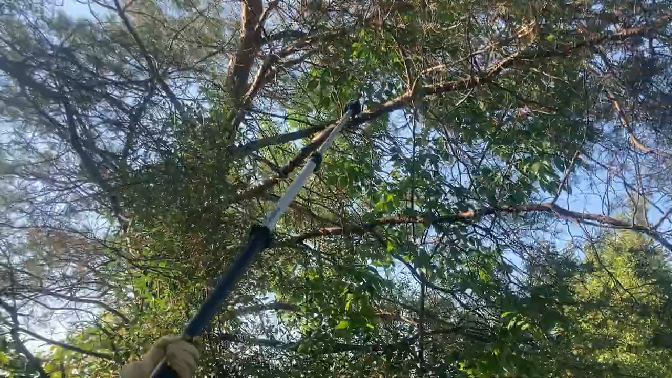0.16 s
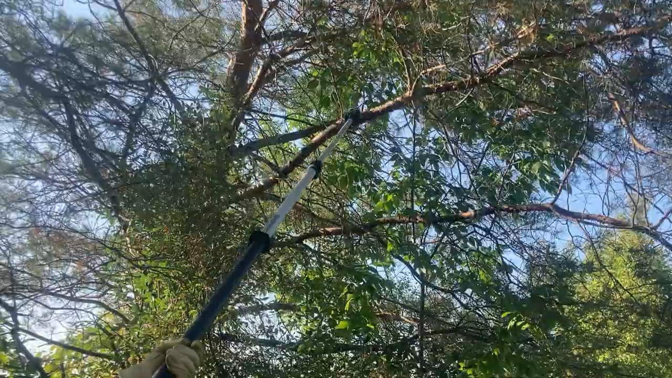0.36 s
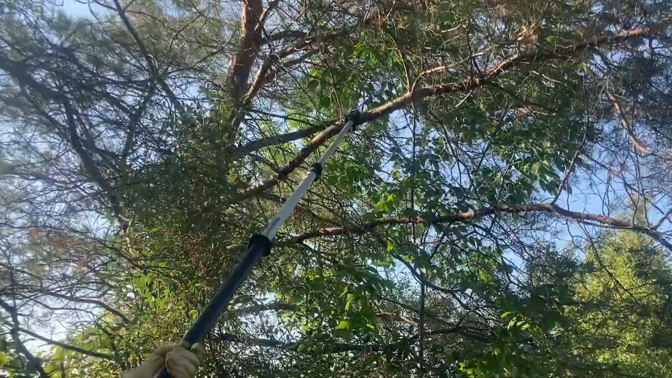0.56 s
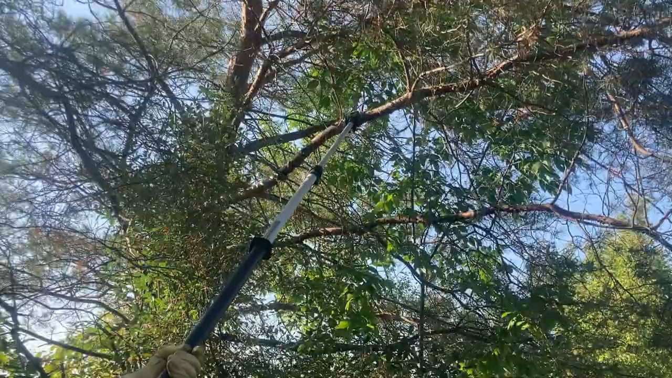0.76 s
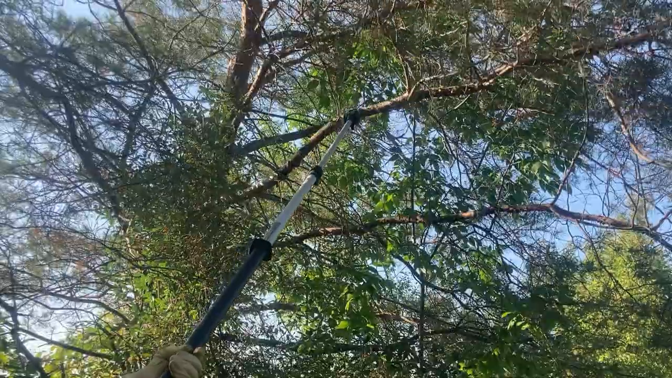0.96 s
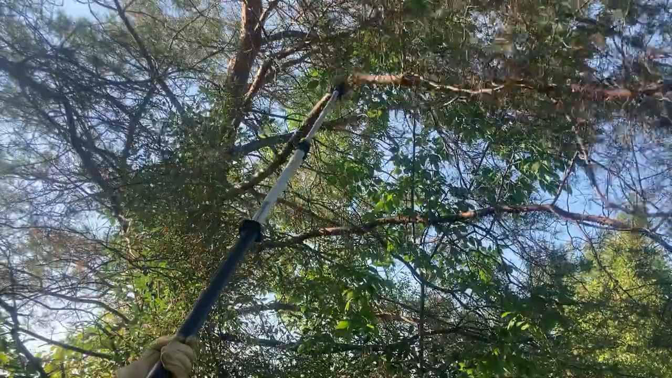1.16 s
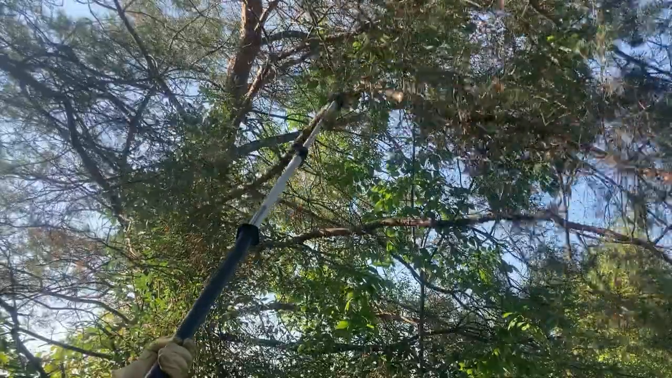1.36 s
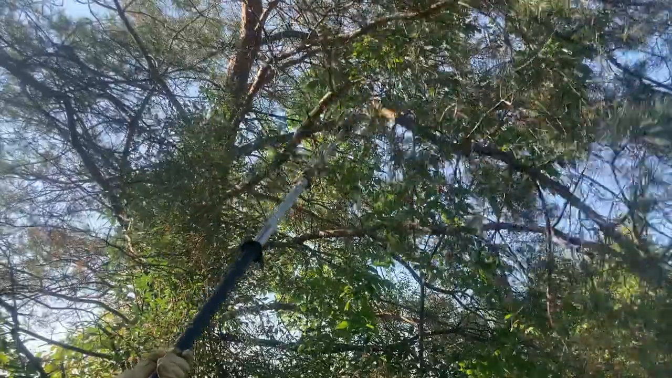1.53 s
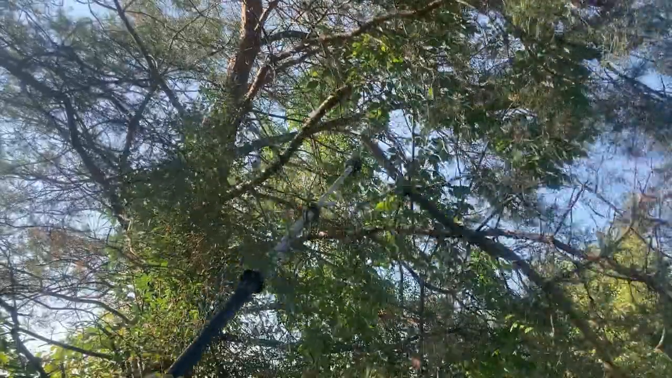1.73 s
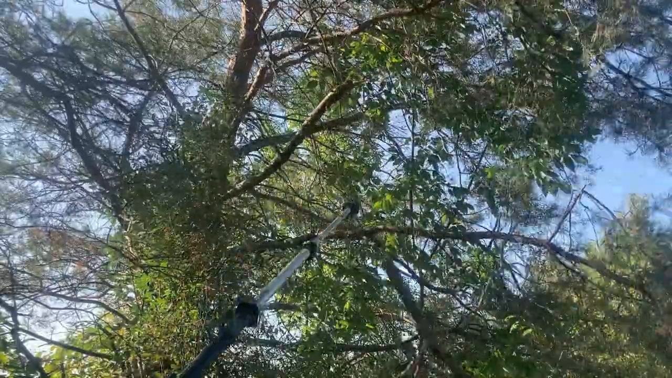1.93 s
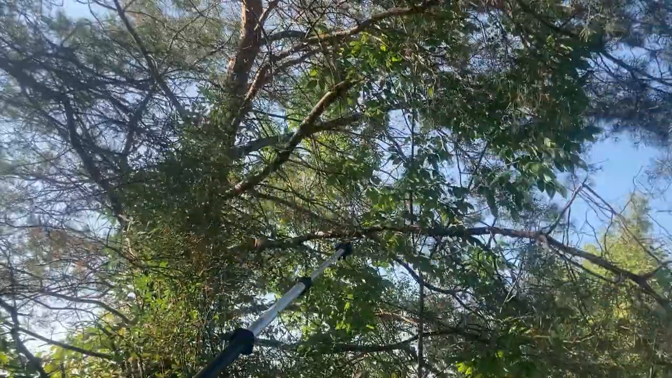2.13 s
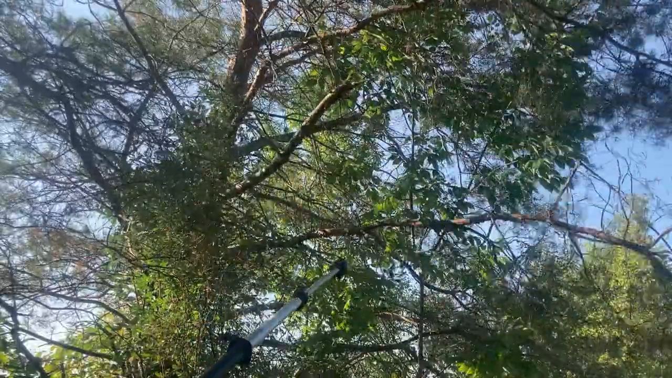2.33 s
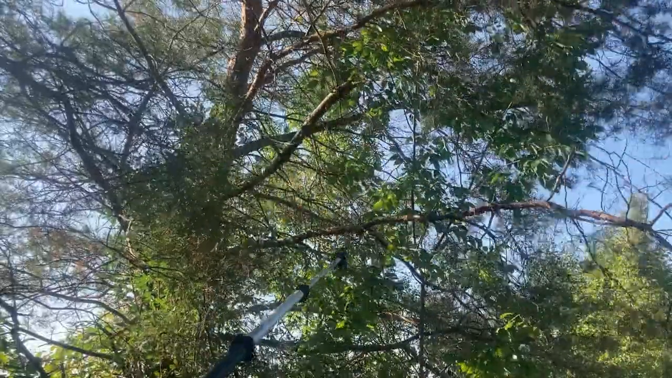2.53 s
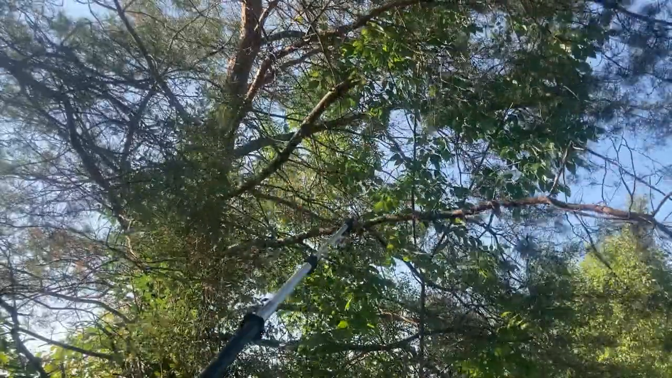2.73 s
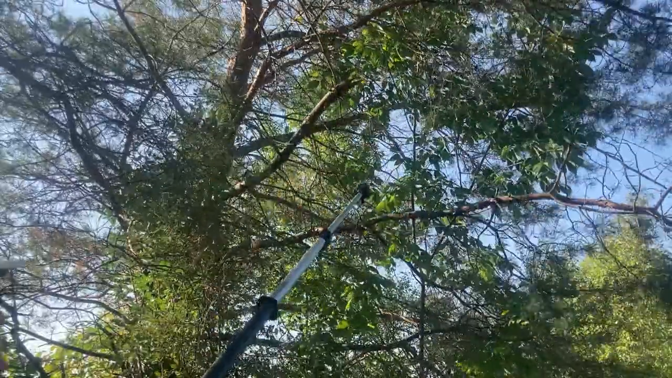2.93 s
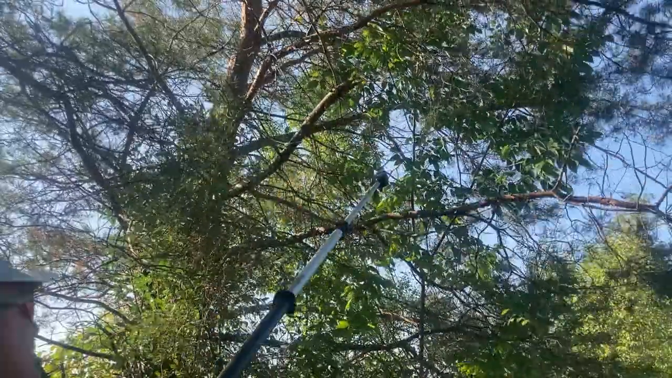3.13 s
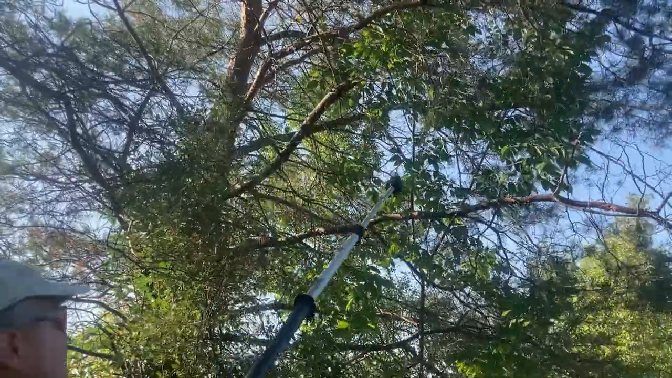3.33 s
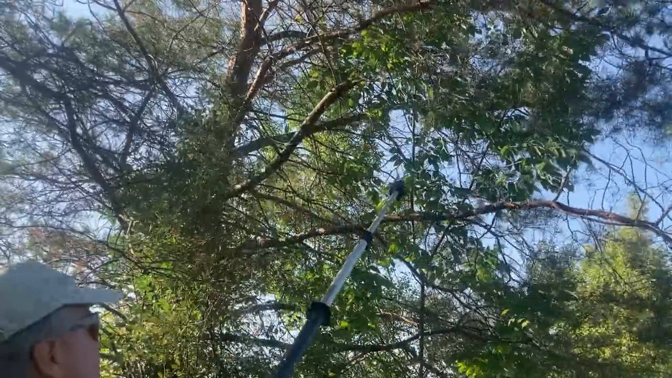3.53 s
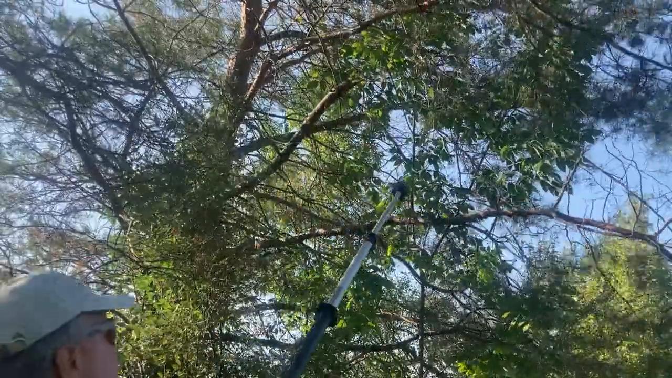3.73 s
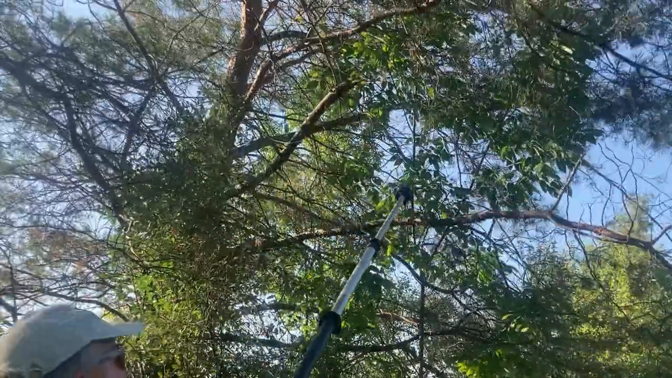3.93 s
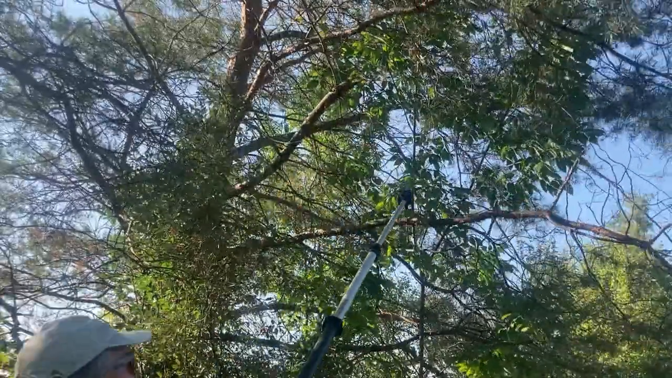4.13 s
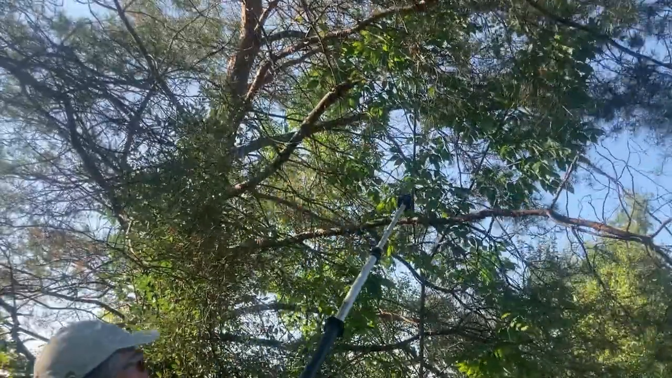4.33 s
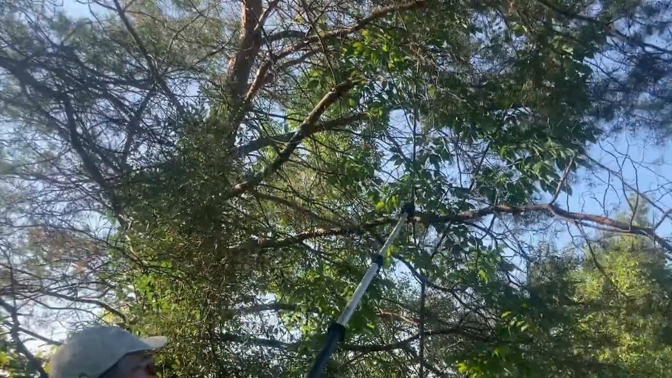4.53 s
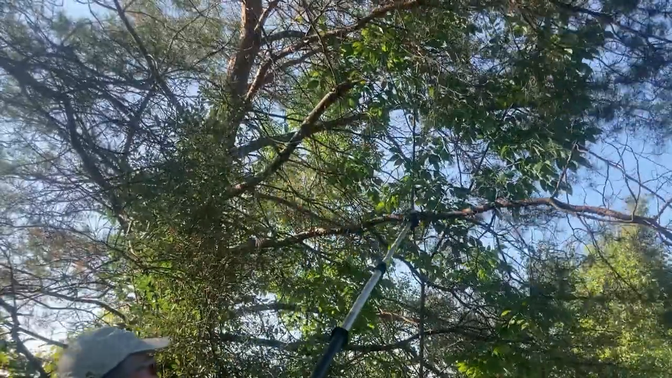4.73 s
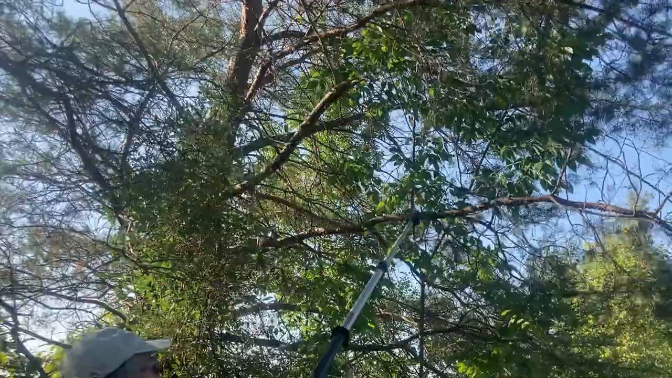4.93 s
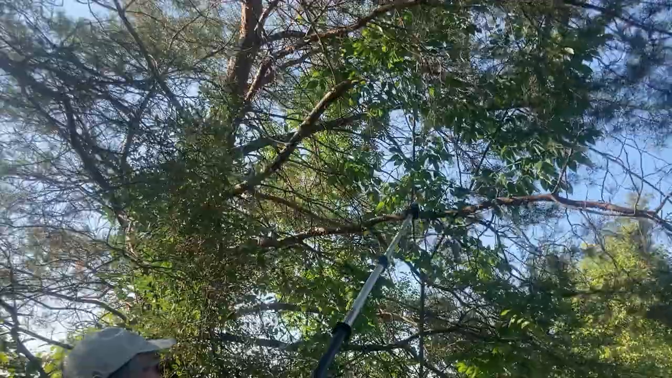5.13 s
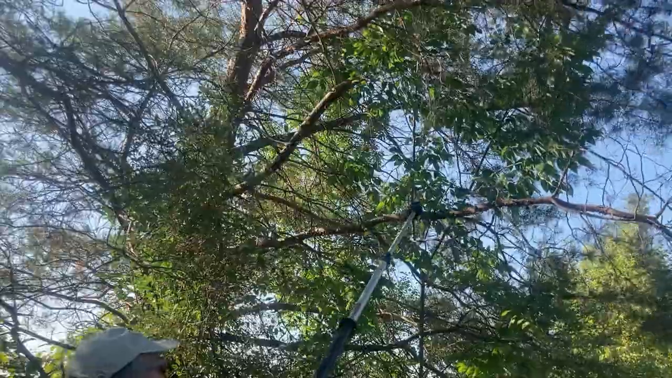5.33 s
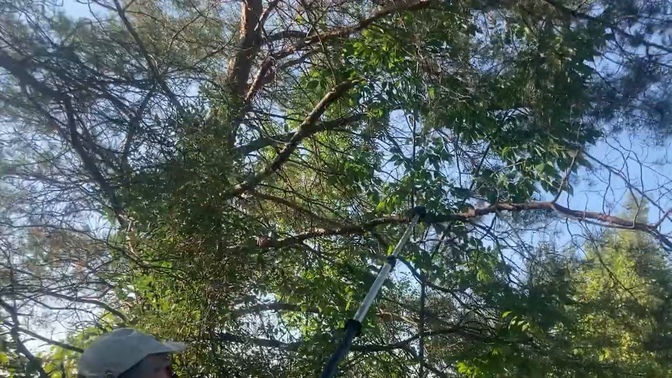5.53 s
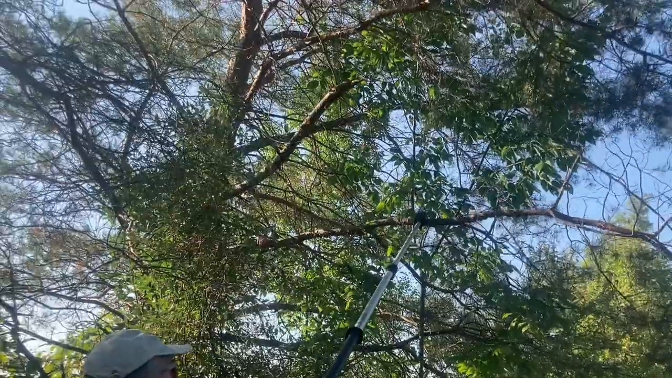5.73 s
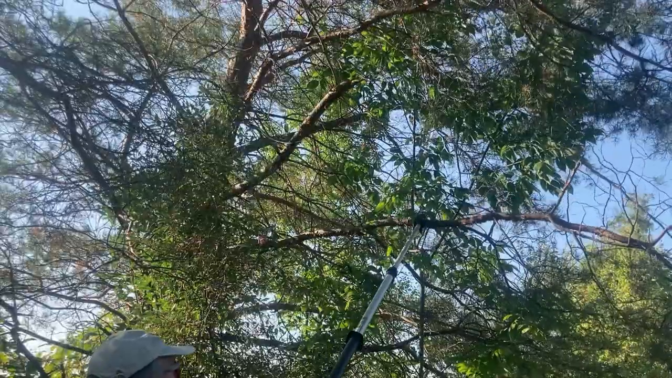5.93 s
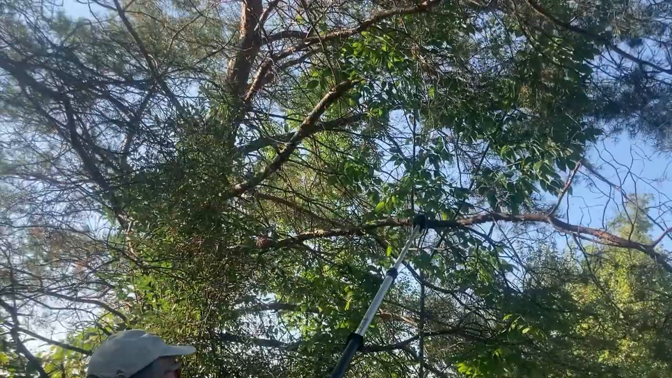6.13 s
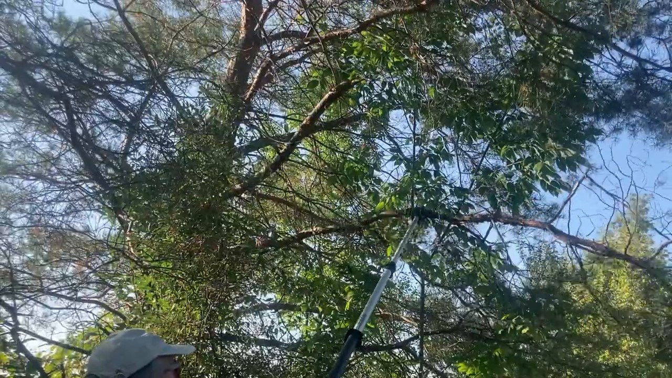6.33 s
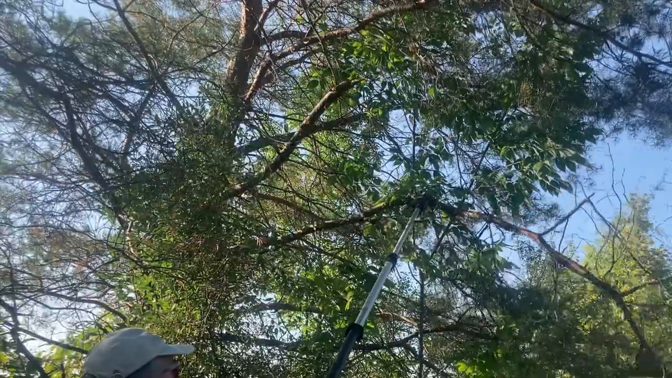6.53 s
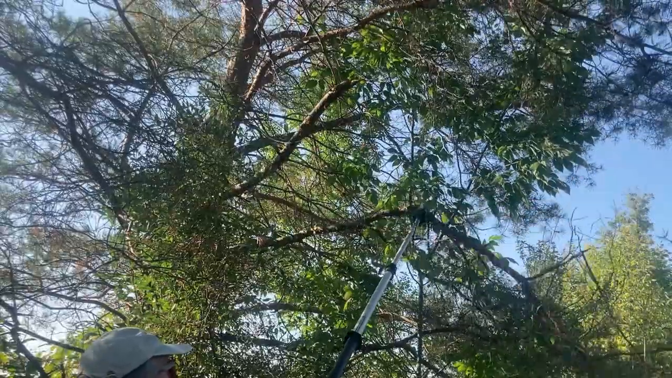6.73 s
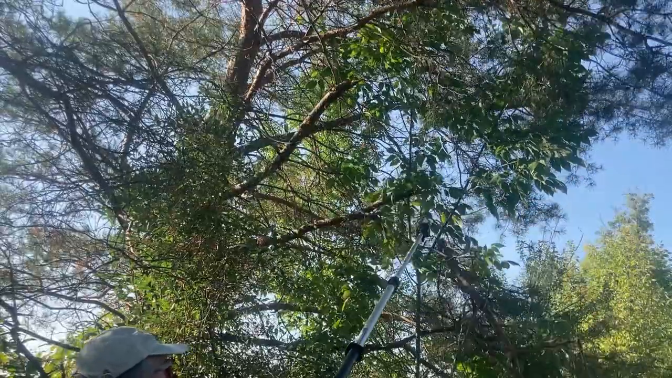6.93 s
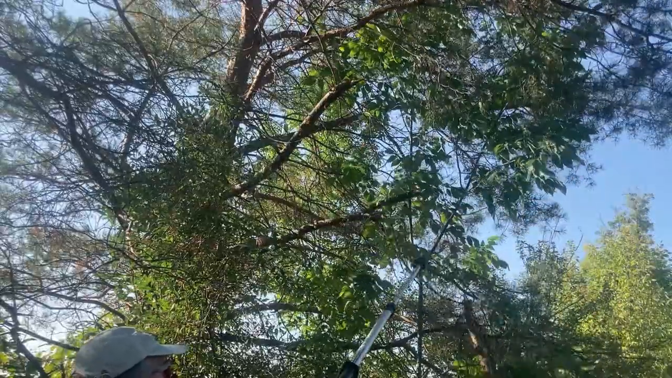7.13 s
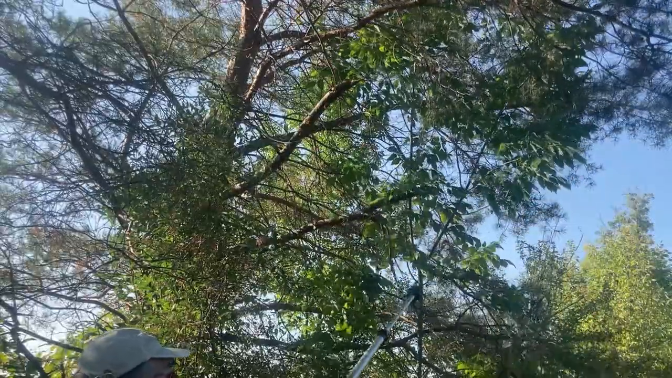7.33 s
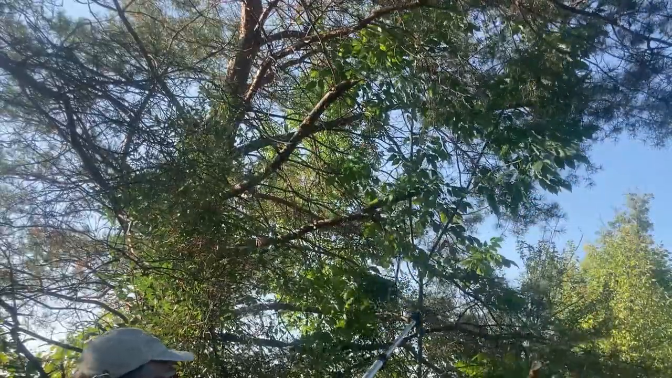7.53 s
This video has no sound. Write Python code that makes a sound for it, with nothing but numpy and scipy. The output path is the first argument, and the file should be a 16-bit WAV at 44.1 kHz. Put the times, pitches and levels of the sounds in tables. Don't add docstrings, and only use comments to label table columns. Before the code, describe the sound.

Two bursts of a battery-powered saw cutting wood outdoors, each starting muffled, with snapping twigs and rustling leaves falling after each.

```python
import sys
import numpy as np
from scipy import signal
from scipy.fft import rfft, irfft
from scipy.io import wavfile
from scipy.ndimage import uniform_filter1d

SR = 44100
rng = np.random.default_rng(int(sys.argv[2]) if len(sys.argv) > 2 else 0)


def boost_factor(decibels):
    exponent = np.asarray(decibels, float) / 20
    return 10 ** exponent


def digitize_waveform(pressure):
    field = np.atleast_2d(pressure).T
    bounded = np.clip(field, -1, 1)
    quanta = np.round(bounded * 32767).astype(np.int16)
    wavfile.write(sys.argv[1], SR, quanta)


N = 334719
T = np.arange(N) / SR
HZ = np.maximum(np.fft.rfftfreq(N, 1 / SR), 1)
TOP_HZ = 15830
GUARD_HZ = 7900
GEAR_RATIO = 5.2
MAIN_TONES = (1, 2, 3, GEAR_RATIO)

# (f/Hz, right leads/rad)
EAR_TURN = [
    [(400, 0), (650, -.9), (850, -1.2), (1300, -2.1), (1900, -.2), (2600, -2.6), (3200, -4), (3550, -4),
     (4300, -.4), (5500, -1.5)],
    [(520, 0), (620, -.8), (700, -2.6), (730, -3.8), (760, -4.6), (900, -6.9), (1450, -6.7), (2900, -6.3),
     (3800, -8.2), (4400, -6.4), (5500, -4)],
    [(300, 0), (1200, -.3), (2100, .3), (4200, .5), (5500, 2.6)],
]
# (pressed/s, let go/s)
TRIGGER = [
    (.115, 1.432),
    (4.575, 7.155),
]
# (t/s, link rate/Hz, cutting pressure/dB)
RUNNING = [
    [(.41, 470.6, 0.5), (.55, 599, 2.5), (.65, 627.4, 2), (.91, 649.3, 2), (1.02, 647, 3), (1.17, 650, -2),
     (1.35, 665.3, -3.5), (1.45, 663.5, -1.5), (1.62, 675, 3)],
    [(4.93, 573, 0), (4.98, 600.6, 1), (5.05, 631.6, 2), (5.5, 677.4, -0.7), (5.92, 716.3, 0.4),
     (6.25, 734, -.3), (6.58, 764, -0.5), (6.95, 727, -2.6), (7.15, 742, -3)],
]


def along(table):
    hz, value = np.array(table).T
    return np.interp(np.log(HZ), np.log(hz), value)


def bell(s, half_s):
    return np.exp(-((T - s) / half_s) ** 2)


def flat_bell(s, half_s):
    return np.exp(-((T - s) / half_s) ** 4)


def humps(rows):
    return sum(boost_factor(db) * flat_bell(s, half_s) for s, half_s, db in rows)


def walk(rate):
    k = int(SR / rate)
    held = np.repeat(rng.standard_normal(512)[:N // k + 1], k)
    return 1.3 * uniform_filter1d(uniform_filter1d(held, k), k)[:N]


def split(x, colour, edges_hz, order):
    under = [1 / (1 + (HZ / f) ** k) for f, k in zip(edges_hz, order)]
    shares = np.diff([0 * HZ, *under, 0 * HZ + 1], axis=0)
    spec = rfft(x) * boost_factor(along(colour)) * (HZ < TOP_HZ)
    low, mid, upper, top = (irfft(spec * share, N) for share in shares)
    both = (mid + upper).std()
    return top / top.std(), upper / both, mid / both, low / low.std()


def patchy(x, patch_db):
    cells = signal.stft(x, nperseg=1024)[2]
    drift = uniform_filter1d(rng.standard_normal(cells.shape), size=5, axis=1)
    drift = uniform_filter1d(drift, size=2, axis=0)
    return signal.istft(cells * boost_factor(patch_db * drift / drift.std()), nperseg=1024)[1][:N]


def ears(direct, scattered, turn):
    # (f/Hz, share 0-1)
    scatter = [(60, .1), (250, .2), (700, .25), (1500, .25), (3000, .45), (5800, .7), (7000, .15),
               (9200, .03), (15500, .05)]
    port_lag_s, port_zero_hz = 2.33e-4, 7000
    ports = 2 * np.pi * port_lag_s * (HZ - port_zero_hz)
    lap = 2 * np.pi * np.round((turn[-1][1] + 2.2) / (2 * np.pi))
    phase = np.where(HZ > 6300, ports, along(turn + [(6300, lap - 1.)]))
    share = np.clip(along(scatter), 0, 1)
    a = rfft(direct) * np.sqrt(1 - share / 2)
    b = rfft(scattered) * np.sqrt(share / 2)
    left = irfft((a + b) * np.exp(-.5j * phase), N)
    right = irfft((a - b) * np.exp(.5j * phase), N)
    return np.array([left, right])


def rumble():
    # (f/Hz, level/dB)
    murmur_colour = [(20, -27), (40, -10), (65, 3.5), (120, 5), (170, 1), (230, -2.5), (400, -64)]
    # (t/s, half length/s, level/dB)
    shudders = [(.75, 0.12, -63), (1.06, 0.13, -54.5), (1.25, 0.053, -56), (1.59, 0.042, -59),
                (1.93, 0.046, -60), (2.15, 0.13, -66), (5.4, 0.042, -62), (5.65, 0.057, -66),
                (5.9, .08, -57), (6.1, .06, -61), (6.4, 0.079, -50.5), (6.66, .05, -54), (7.0, 0.11, -63),
                (7.38, .1, -74)]
    air_db = -67.5
    pair = irfft(rfft(rng.standard_normal((2, N))) * boost_factor(along(murmur_colour)), N)
    pair *= (boost_factor(air_db) + humps(shudders)) * boost_factor(3.8 * walk(9)) / pair.std()
    return ears(*pair, EAR_TURN[2])


def rustle():
    # (f/Hz, level/dB)
    leaf_colour = [(170, -12.5), (230, -10.5), (350, -5.5), (700, -3.5), (2000, 2.5), (4000, 1), (6000, -2),
                   (8000, 1.5), (10000, 3.5), (13000, -0.5), (15700, -2)]
    # (t/s, level/dB)
    leaf_levels = [(0, -60), (1.5, -41), (1.72, -39.5), (1.83, -36), (2.04, -32), (2.2, -36), (2.49, -43),
                   (2.75, -48.5), (3.3, -50.5), (3.6, -48.5), (4.15, -52), (4.5, -60), (7.2, -28.5),
                   (7.4, -36.5), (7.59, -47.5)]
    # (t/s, half length/s, level/dB)
    glove_moves = [
        (.11, 0.035, -53),
        (1.81, 0.022, -59),
        (1.93, 0.016, -53),
        (2.9, 0.041, -72),
        (3.33, 0.019, -54),
        (3.39, 0.032, -60),
        (3.76, 0.052, -62),
        (4.57, 0.06, -51.5),
        (7.33, 0.084, -43),
        (7.53, 0.055, -58),
    ]
    leaf_middle_db, glove_middle_db = -11.5, -11
    ticks = (rng.random(N) < 300 / SR) * boost_factor(np.minimum(5.2 * rng.exponential(size=N), 9.))
    smeared = signal.lfilter([1], [1, -np.exp(-1 / (0.004 * SR))], ticks)
    grain = boost_factor(2.3 * walk(11)) * (1 + 0.18 * smeared)
    leaf_db, grip = np.interp(T, *np.transpose(leaf_levels)), humps(glove_moves)
    air = boost_factor(-67.5 + 0.5 * (leaf_db + 55.5) + 1.8 * walk(11))
    pair = []
    for _ in "ab":
        noise = grain * rng.standard_normal(N)
        top, upper, mid, low = split(noise, leaf_colour, (900, 2000, 4000), order=(3, 4, 8))
        middle = boost_factor(leaf_middle_db + 0.83 * walk(15)) * (upper + mid)
        leaves = boost_factor(leaf_db - 0.5) * (top + middle)
        pair.append(leaves + (air + grip) * low + boost_factor(glove_middle_db) * grip * mid)
    return ears(*pair, EAR_TURN[2])


def cracks():
    # (t/s, dull peak/dB, middle peak/dB, bright peak/dB, ring under the snap/dB)
    fibres = [(.0747, -42, -40, -51, 0), (1.0303, -28, -6, -16, -26), (1.0326, -5, 1.5, -5, -32),
              (1.0348, -19, -30, 4, -25), (1.0439, -11, -27, -29, -13), (1.0856, -25, -6, 0, -23),
              (1.0973, -10.5, -42, -2, -15), (1.2234, -27, -9, -0.5, -16), (1.814, -30.5, -40, -39, -6),
              (1.832, -32, -40, -34, -3), (1.866, -36, -42, -25, -11), (4.518, -51, -56, -60, -1),
              (6.3321, -27, -5, -5, -9), (6.4031, -13, -5, -18, -16), (6.8727, -24, -6, -12, -16),
              (6.89, -35, -13, -25, -23), (6.963, -32, -7.5, -8, -12), (7.089, -38, -18, -2.5, -20),
              (7.2069, -13.5, -5, 0, -10.5), (7.5052, -33, -46, -39, -16)]
    # (t/s, middle peak/dB, bright peak/dB)
    twigs = [(0.113, -28, -27), (.1273, -36, -23), (1.778, -27, -19), (1.792, -22, -6.5), (1.834, -25, -18),
             (1.8681, -32, -25), (1.8942, -16, -3.5), (1.9187, -22, -10), (1.9703, -34, -18),
             (2.0027, -38, -23), (2.0308, -19, -15), (2.0415, -15, 5.5), (2.08, -28, -22),
             (2.1054, -17, -5.5), (2.2137, -27, -17), (2.342, -21, -11), (2.801, -17, -5.5),
             (3.0067, -34, -22), (3.056, -37, -27), (3.377, -43, -27), (3.6178, -17.5, -8.5),
             (3.7448, -25, -14.5), (4.0594, -35, -30), (4.1035, -20, -17), (4.1868, -37, -24.5),
             (4.5678, -36, -28), (7.3328, -15, -9.5), (7.5258, -53, -31)]
    # (f/Hz, right leads/rad)
    snap_turn = [(300, 0), (4200, .3), (5500, -1.2)]
    twig_dull_db, twig_ring_db = -14.5, -22.5
    size = 6000
    t = np.arange(size) / SR
    edges_hz = [600, 2000], [2300, 6000], [5500, 13000]
    bands = [signal.butter(2, edge, "bandpass", fs=SR, output="sos") for edge in edges_hz]
    rows = fibres + [(s, mid_db + twig_dull_db, mid_db, top_db, twig_ring_db) for s, mid_db, top_db in twigs]
    snap = np.exp(-t / .0006)
    ring_shape = (np.exp(-t / 0.0091) + 0.28 * np.exp(-t / 0.052)) * np.minimum(t / 0.00033, 1)
    out = np.zeros((2, N + size))
    for s, *peak_db, ring_db in rows:
        ring = boost_factor(ring_db + 5.0) * ring_shape
        burst = rng.standard_normal((2, size)) * np.array([snap + ring, .3 * snap + ring])
        burst[0, 2] += 3.
        start = int(s * SR)
        for db, band in zip(peak_db, bands):
            part = signal.sosfilt(band, burst)
            peak = abs(signal.hilbert(part[0, :256])).max()
            out[:, start:start + size] += boost_factor(db) * part / peak
    out = irfft(rfft(out[:, :N]) * np.where(HZ < TOP_HZ, boost_factor(-0.67), boost_factor(-36)), N)
    return ears(*out, snap_turn)


def speed(burst):
    # (t/s, half length/s, sag/Hz)
    bites = [
        (5.239, 0.17, 132),
        (5.81, 0.053, 17),
        (6.371, .07, 35),
        (6.836, .07, 45),
    ]
    spin_up_hz_per_s, run_down_hz_per_s = 1600, 2550
    pressed, let_go = TRIGGER[burst]
    s, hz, _ = np.transpose(RUNNING[burst])
    loaded = np.interp(T, s, hz) - sum(sag * flat_bell(at, half_s) for at, half_s, sag in bites)
    up = np.where(T < s[0], spin_up_hz_per_s * (T - pressed), loaded)
    down = run_down_hz_per_s * np.maximum(T - let_go, 0)
    link_hz = np.maximum(np.minimum(up, loaded) - down, 20)
    return uniform_filter1d(link_hz, size=1800)


def resonance(hz, centre_hz, width_hz, top_db):
    return top_db / (1 + (2 * (hz - centre_hz) / width_hz) ** 2)


def whine(burst, link_hz, links):
    # (link tone/dB, its octave/dB, its twelfth/dB, gear whine/dB)
    full_tones = [
        (-38.5, -34, -31.5, -29.5),
        (-34.5, -33, -31.5, -35),
    ]
    free_tones = (-42, -44, -49, -47)
    # (t/s, half length/s, tone 0-3, depth/dB)
    echo_nulls = [(.65, .07, 0, 14), (.92, .15, 0, 20), (.51, .03, 2, 14), (5.48, .05, 0, 17),
                  (5.7, .07, 0, 15), (7.23, .07, 1, 16), (6.37, .08, 0, 18), (6.76, .07, 0, 9),
                  (.77, .09, 1, 12), (1.19, .11, 1, 14), (1.38, .06, 1, 14), (5.0, .06, 1, 19),
                  (5.55, .06, 1, 9), (5.81, .06, 1, 12), (6.5, .16, 1, 22), (6.82, .05, 1, 17),
                  (.47, .05, 1, 6), (1.2, .16, 2, 9), (1.41, .04, 2, 10), (5.59, .05, 2, 13),
                  (5.81, .06, 2, 19), (6.39, .07, 2, 16), (6.69, .04, 2, 10), (6.82, .06, 2, 16),
                  (6.97, .025, 2, 9), (.48, .07, 3, 18), (1.12, .06, 3, 11), (5.25, .12, 1, 5),
                  (5.3, .4, 3, 9), (6.55, .12, 3, 9)]
    # (multiple of link rate, level over the typical tone/dB)
    faint_tones = [
        [(.51, -16), (1.3, -8), (2.167, -10), (2.915, -7), (4, -13), (5, -15), (6, -18), (7, -18), (9.4, -14),
         (12, -16)],
        [(.433, -26), (1.3, -17), (2.167, -11), (4, -12.5), (5, -15), (6, -16), (7, -16), (9, -20), (12, -17)],
    ]
    # (f/Hz, width/Hz, lift/dB)
    housing = [(2834, 300, 10.5), (3730, 160, 15.5), (4290, 620, 13), (6460, 400, 11)]
    slack_hz, link_db_per_octave, gear_db_per_octave = 430, 30, 5
    spin_up_db = -7
    wobble_order = .085
    under = np.minimum(np.log2(link_hz / slack_hz), 0)
    loaded_from = RUNNING[burst][0][0]
    free = uniform_filter1d(1. * ((T < loaded_from) | (T > TRIGGER[burst][1])), size=1300)
    tones = np.zeros(N)
    for i, (k, full_db, free_db) in enumerate(zip(MAIN_TONES, full_tones[burst], free_tones)):
        slope = gear_db_per_octave if i == 3 else link_db_per_octave
        null_db = sum(depth * bell(s, half_s) for s, half_s, tone, depth in echo_nulls if tone == i)
        pole_db = resonance(k * link_hz, 1400, 800, 16)
        free_change_db = free_db - full_db + spin_up_db * (T < loaded_from) + pole_db
        tone_db = full_db + slope * under - null_db + free * free_change_db
        labour = (k == 2) * .6 * np.clip((600 - link_hz) / 60, 0, 1)
        wobble = 1 + (0.14 + labour) * np.sin(2 * np.pi * (wobble_order * links + rng.random()))
        tones += wobble * boost_factor(tone_db + 2.4 * walk(25)) * np.sin(2 * np.pi * k * links)
    gear_db = tone_db
    slack = np.clip((480 - link_hz) / 120, 0, 1)
    for turns in (7, 8, 10, 14, 16):
        strand_db = gear_db - 11 + 4 * walk(25)
        tones += slack * boost_factor(strand_db) * np.sin(2 * np.pi * turns * GEAR_RATIO / 12 * links)
    typical_db = np.mean(full_tones[burst]) - 3 + link_db_per_octave * under + spin_up_db * free
    for k, db in faint_tones[burst]:
        lift_db = sum(resonance(k * link_hz, *ring) for ring in housing)
        tones += boost_factor(typical_db + db + lift_db + 2.5 * walk(14)) * np.sin(2 * np.pi * k * links)
    return tones


def rasp(burst, link_hz, links):
    # (f/Hz, level/dB)
    wood_colour = [(170, -33), (230, -10), (350, -9.5), (700, -2.5), (2000, 0.5), (4000, 2.5), (5200, -4.5),
                   (7000, -1), (9500, 2), (13000, -0.5), (15700, -4.5)]
    middle_db, bass_db = 0., -11.5
    s, _, pressure_db = np.transpose(RUNNING[burst])
    link_force = rng.standard_normal(N // 40)[links.astype(int)]
    force = boost_factor(1.1 * link_force + 0.77 * walk(12) + 1.84 * walk(6))
    strike = force * (1.6 + np.exp(-(links % 1) / 0.3))
    gain = boost_factor(-28.5 + np.interp(T, s, pressure_db) + 9 * np.log2(link_hz / 650))
    pair = []
    for _ in "ab":
        scrape = patchy(strike * rng.standard_normal(N), patch_db=3.0)
        top, upper, mid, low = split(scrape, wood_colour, (1000, 4600, GUARD_HZ), order=(8, 8, 120))
        pair.append(gain * (top + boost_factor(middle_db) * (upper + mid) + boost_factor(bass_db) * low))
    return pair


def saw(burst):
    link_hz = speed(burst)
    on = np.clip((link_hz - 20) / 40, 0, 1)
    glide = uniform_filter1d(abs(np.gradient(link_hz)) * SR / link_hz, size=2000)
    flutter = (.0025 + .006 * np.clip(glide - 1.2, 0, 4)) * walk(60)
    links = np.cumsum(link_hz * (1 + flutter)) / SR
    direct, scattered = rasp(burst, link_hz, links)
    tones = np.sqrt(2) * patchy(whine(burst, link_hz, links) * on, patch_db=1.3)
    return ears(tones + boost_factor(1.0) * on * direct, boost_factor(2.5) * on * scattered, EAR_TURN[burst])


def scene():
    return rumble() + rustle() + cracks() + saw(0) + saw(1)


def guard(dry):
    # (from/s, to/s)
    shut_times = [
        (.14, .405),
        (4.625, 4.957),
    ]
    # (f/Hz, level/dB)
    guard_cut = [(100, -28), (400, -22.5), (1500, -20), (3500, -22.5), (5000, -22), (6000, -27)]
    # (t/s, half length/s, relief/dB)
    relief = [
        (.345, 0.029, 12.5),
        (0.413, .02, 0),
        (4.713, 0.065, 13),
        (4.895, 0.029, 11),
    ]
    edge_s, flutter_db = 0.0076, 3.5
    below = rfft(dry) * (HZ < GUARD_HZ)
    relief_db = sum(db * bell(s, half_s) for s, half_s, db in relief) + flutter_db * walk(30.37)
    dimmed = irfft(below * boost_factor(along(guard_cut)), N) * boost_factor(relief_db)
    shut = sum(np.clip(np.minimum(T - a, b - T) / edge_s + .5, 0, 1) for a, b in shut_times)
    return dry + shut * (dimmed - irfft(below, N))


def roll_off(x):
    return signal.sosfilt(signal.butter(12, 16990, fs=SR, output="sos"), x)


def record(dry):
    dry = guard(dry)
    over = np.maximum(abs(dry) - .6, 0)
    held = dry - np.sign(dry) * (over - .3 * np.tanh(over / .3))
    mix = irfft(rfft(held) * (HZ < 16700), N)
    return roll_off(mix)


dry = scene()
out = record(dry)
digitize_waveform(out)
```